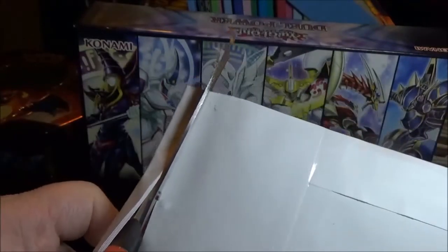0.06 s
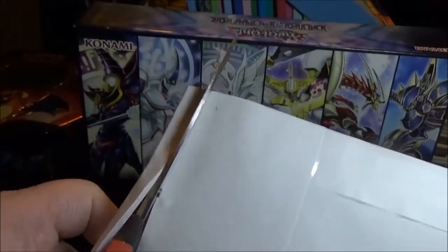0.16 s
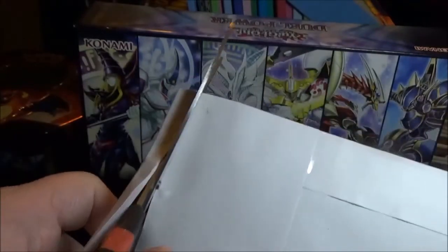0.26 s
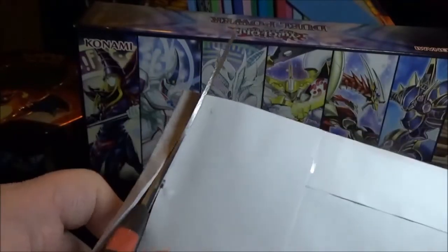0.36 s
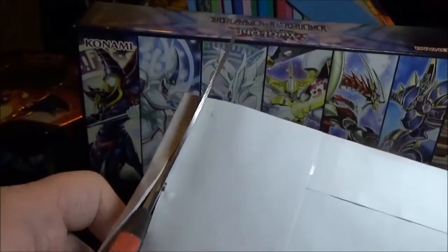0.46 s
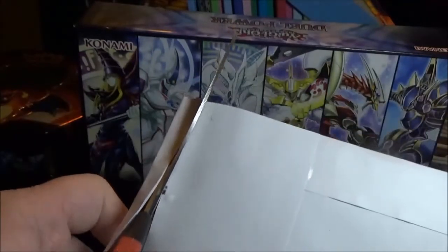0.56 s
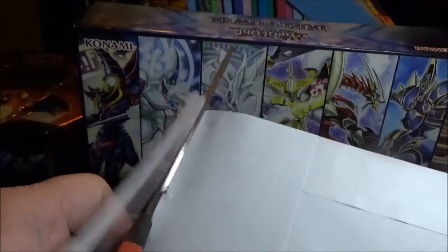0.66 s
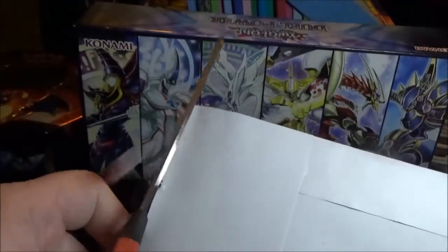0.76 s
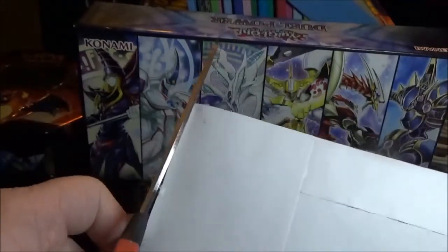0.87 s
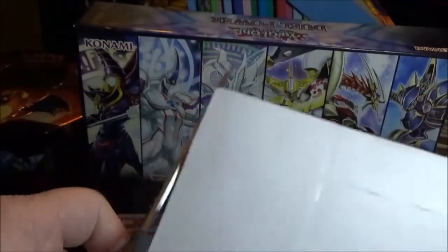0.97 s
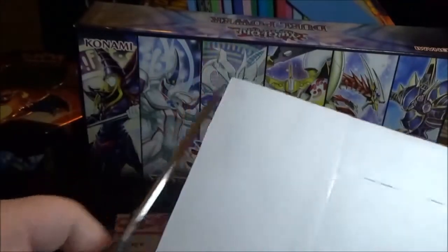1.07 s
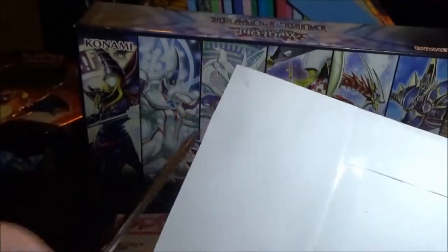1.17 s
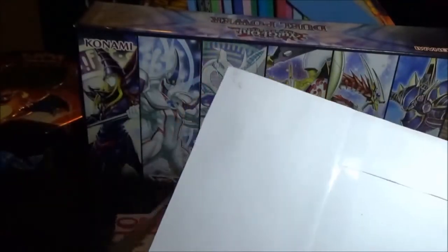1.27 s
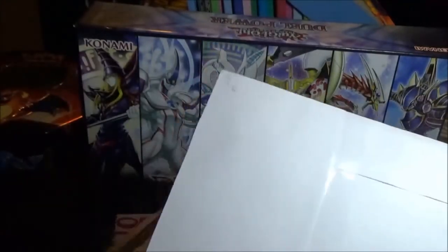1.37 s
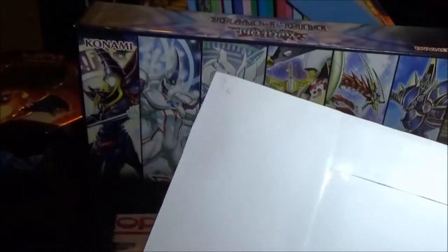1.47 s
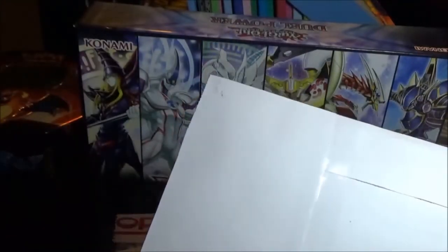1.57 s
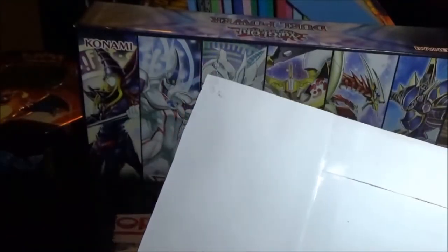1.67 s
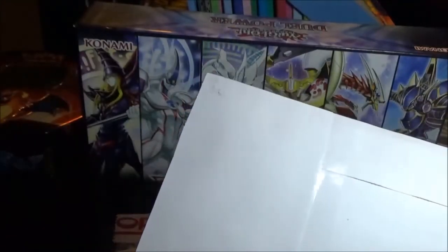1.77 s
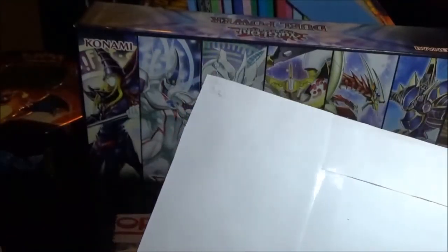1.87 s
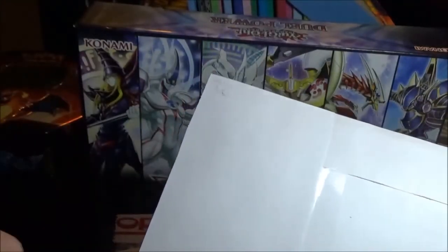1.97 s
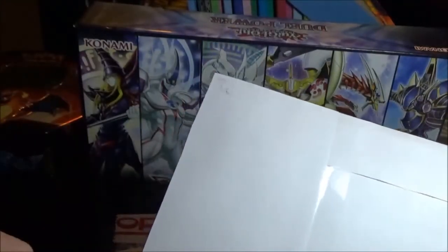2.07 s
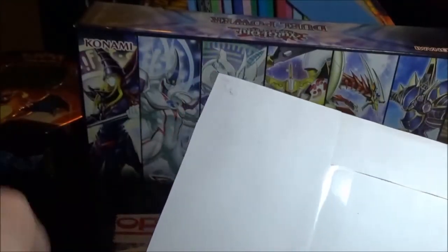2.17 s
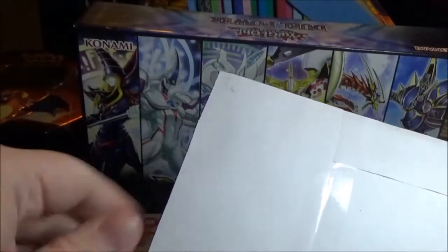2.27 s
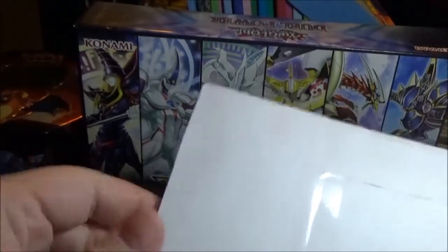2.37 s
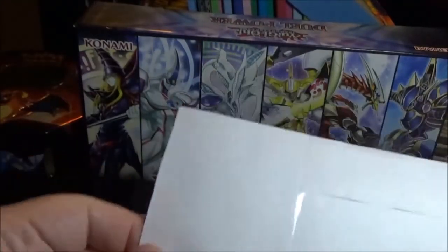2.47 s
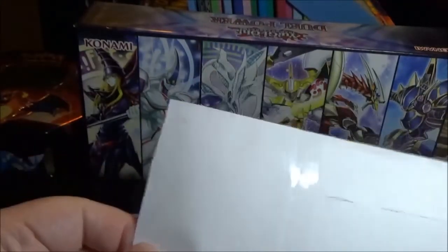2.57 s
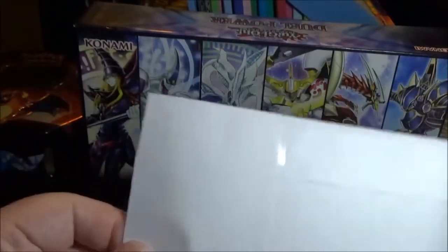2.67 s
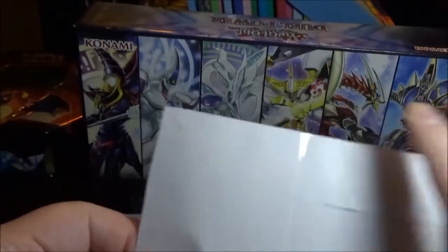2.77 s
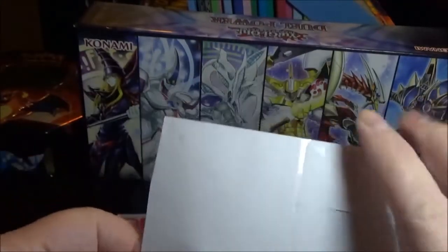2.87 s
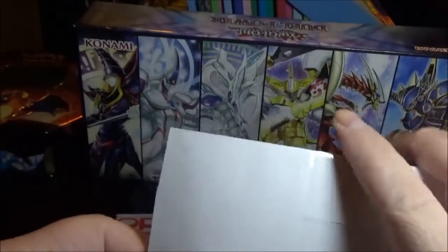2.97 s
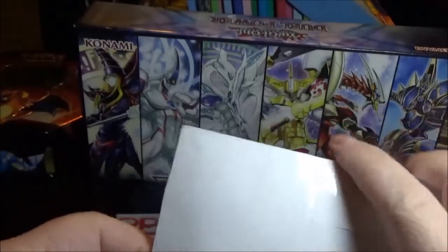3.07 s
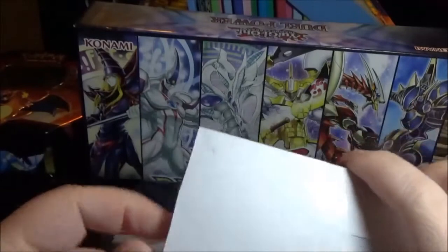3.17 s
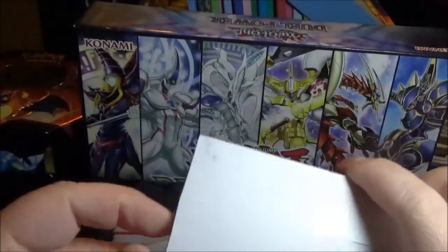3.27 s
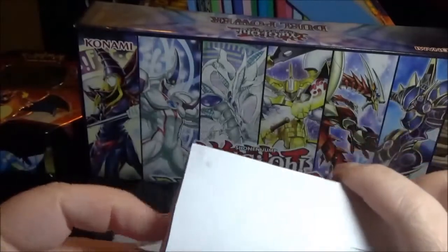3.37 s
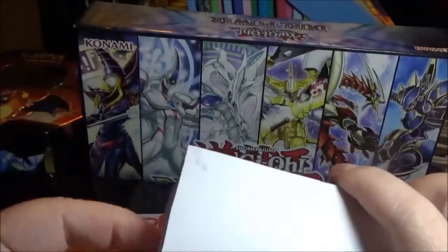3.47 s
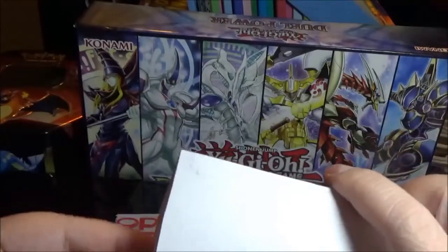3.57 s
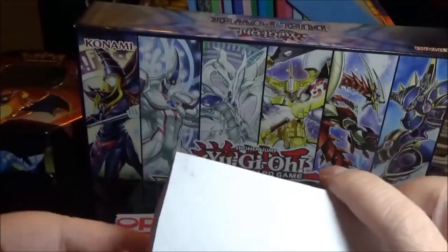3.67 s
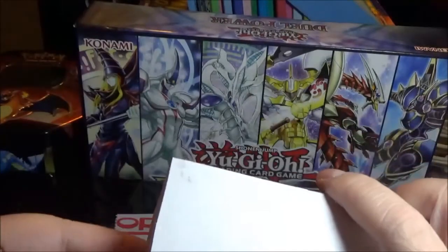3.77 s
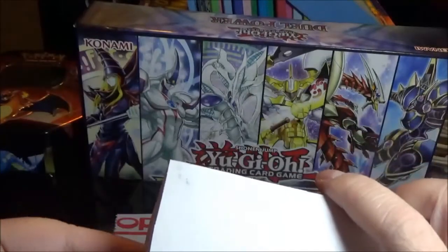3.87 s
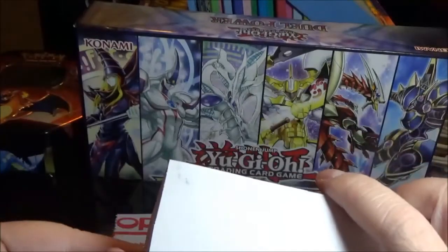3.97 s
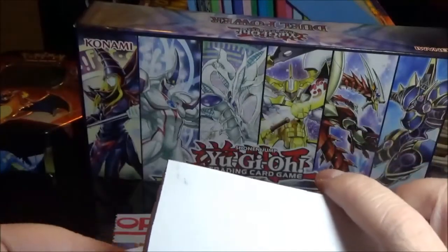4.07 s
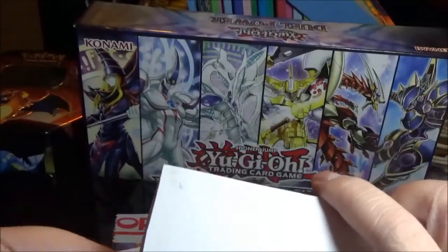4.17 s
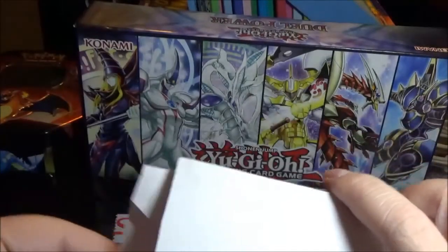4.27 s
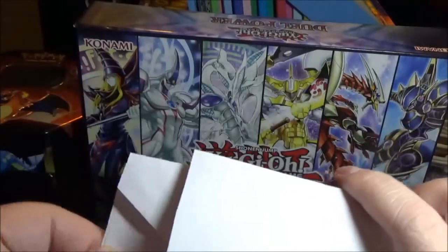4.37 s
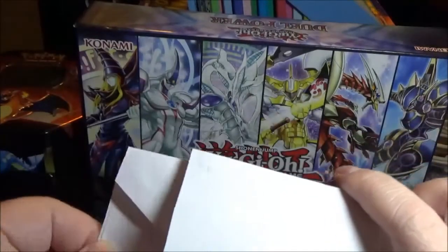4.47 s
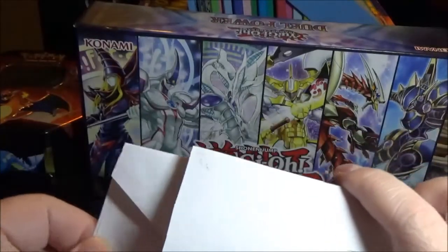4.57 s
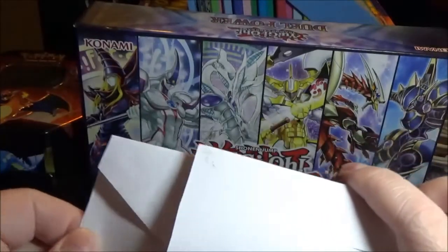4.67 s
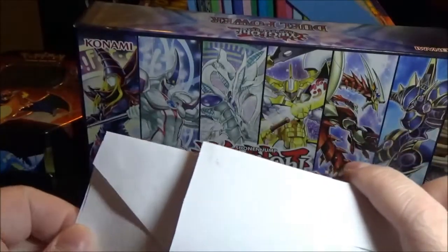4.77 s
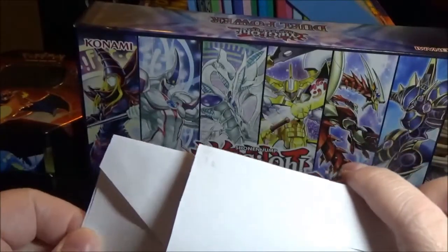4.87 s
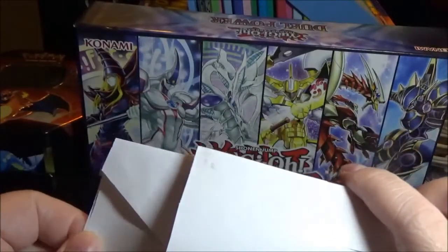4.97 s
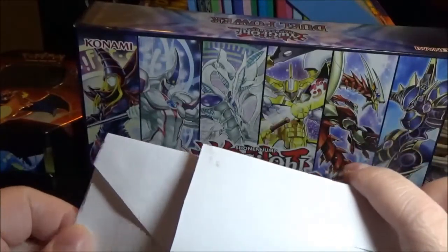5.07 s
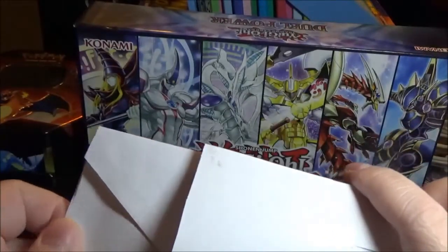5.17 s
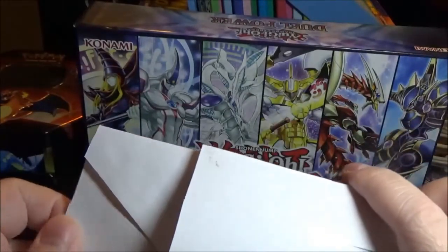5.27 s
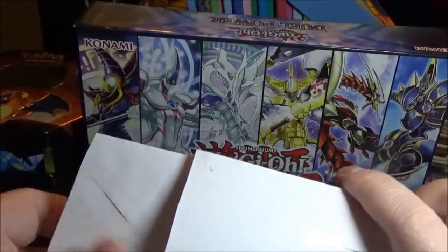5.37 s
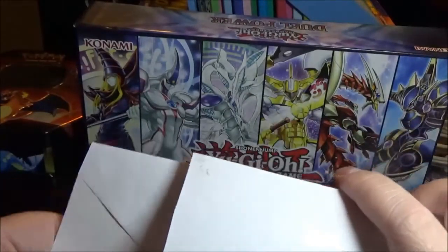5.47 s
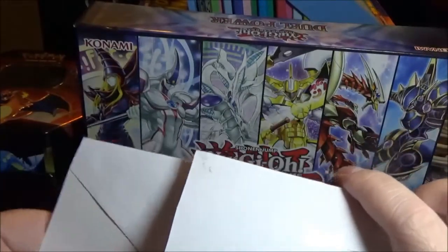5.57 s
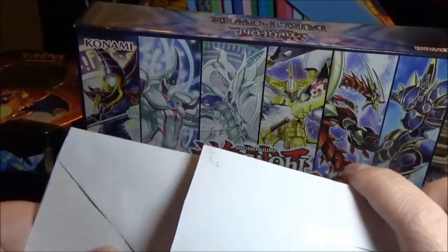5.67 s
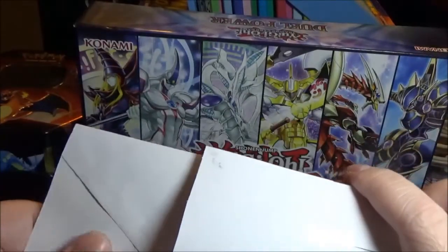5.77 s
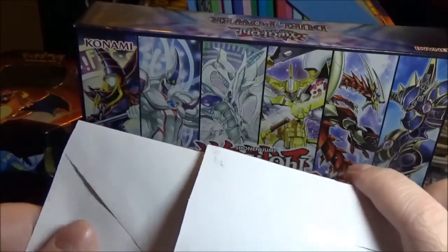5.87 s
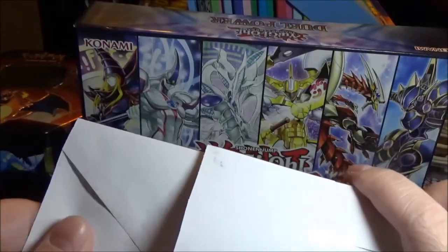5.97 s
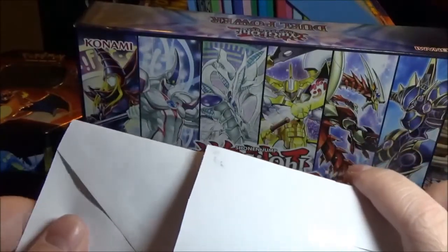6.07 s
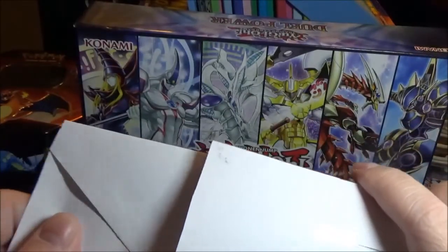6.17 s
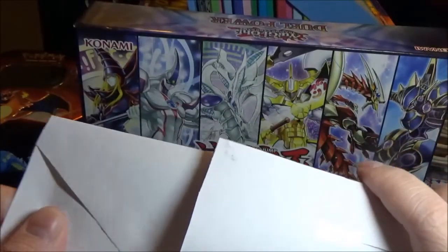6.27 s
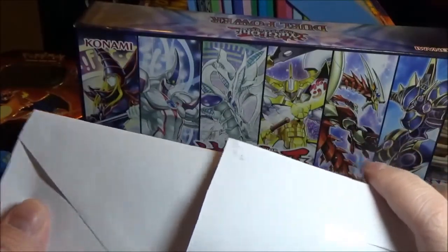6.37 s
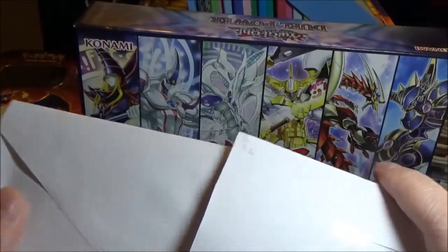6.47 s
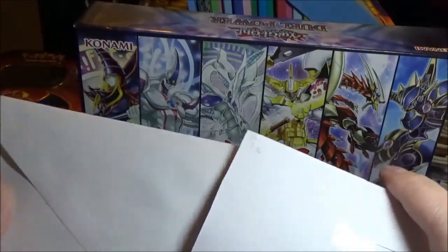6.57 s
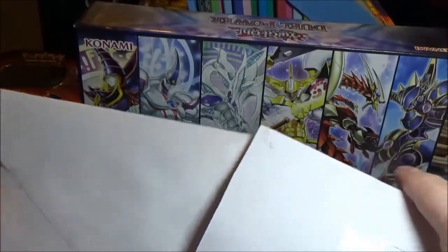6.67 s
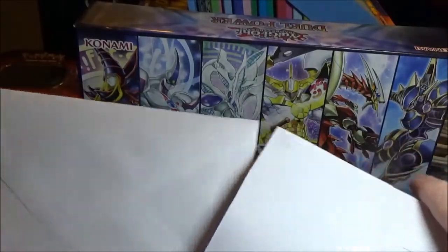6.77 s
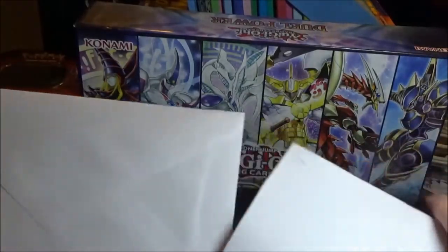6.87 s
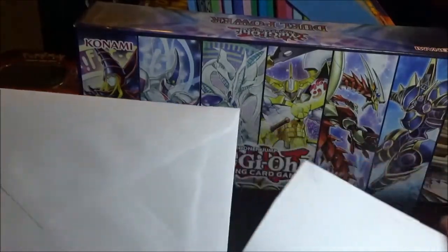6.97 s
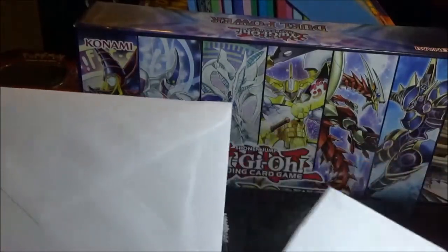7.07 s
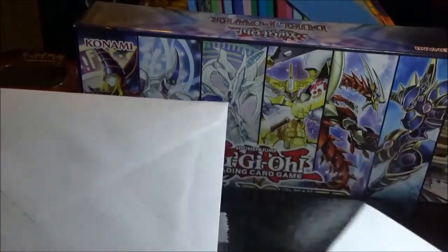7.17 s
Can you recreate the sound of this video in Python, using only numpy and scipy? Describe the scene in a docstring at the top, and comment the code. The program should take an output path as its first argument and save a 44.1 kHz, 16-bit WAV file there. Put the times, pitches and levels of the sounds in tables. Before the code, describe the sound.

In a small quiet room with a faint fan and thin electronic whine, scissors brush and cut an envelope's edge, closing with a hard metallic snip. After a pause they clunk on a wooden desk. Fingers crinkle and snap the paper, then a folded sheet is dragged out in short, hissing pulls, ending with crisp pops. Close stereo microphone.

```python
"""A small quiet room, close to a stereo microphone, with a faint fan and electronic whine.
Scissors cut the edge off a paper envelope, snip shut and are laid on a wooden desk: noise bursts and rings.
Fingers buckle the envelope: each crease snaps as a burst in three registers, some with dull low swings.
A folded sheet is drawn out in short pulls: shaped noise whose rustle and hiss grow with the speed of the slide."""
import sys
import numpy as np
from scipy import signal
from scipy.fft import rfft, irfft, next_fast_len
from scipy.io import wavfile
from scipy.ndimage import uniform_filter1d, map_coordinates

SR = 44100
rng = np.random.default_rng(int(sys.argv[2]) if len(sys.argv) > 2 else 0)


def wav_record(signal):
    """Record a signal, one row per channel, as 16-bit PCM in the file named by sys.argv[1]."""
    frames = np.transpose(np.atleast_2d(signal))
    bounded = np.clip(frames, -1, 1)
    # unit amplitude maps onto the largest positive 16-bit level
    quanta = np.round(bounded * 32767).astype(np.int16)
    wavfile.write(sys.argv[1], SR, quanta)


def invert_db(x):
    """Field ratio 10**(x/20) for x, a level in decibels (scalar or array-like)."""
    u = np.asarray(x, float) / 20
    return 10 ** u


N = 318843

# Room tone colour: (frequency [Hz], relative level [dB per Hz])
AIR_COLOUR = [(15, -45), (25, -16), (77, -11), (101, -10), (134, -8.5), (169, -12.5), (327, -8),
              (381, -11.5), (468, -14.5), (518, -12), (2390, -17), (3590, -19), (11000, -24), (14300, -61),
              (22000, -120)]
# Left-right likeness of the room tone: (frequency [Hz], correlation [-1 to 1])
AIR_LIKENESS = [(60, 0.89), (170, 0.97), (490, 0.035), (1410, 0.02), (4040, 0.17), (11600, 0.85)]
# Thin electronic tones: (frequency [Hz], relative level [dB])
WHINE_TONES = [(1803, -90.5), (3601, -84.5), (3720, -90.5), (7025, -89), (7144, -94.5), (7445, -98.5)]
# Dying away of the room: (frequency [Hz], t60 [s])
ROOM_DECAY = [(150, 0.11), (1000, 0.24), (4000, 0.23), (10000, 0.18)]
# Band limit of the recorder: (frequency [Hz], gain [dB])
BAND_LIMIT = [(10900, 0), (11030, -3.5), (11150, -39.5), (12200, -44.5), (16000, -80)]
# Place of the working hands: (time [s], left over right [dB])
HAND_PAN = [(0, -0.5), (.64, 1), (.9, 1.5), (1.14, -3), (1.8, 2.5), (2.1, 1), (2.6, -2), (3.3, -1.5),
            (3.7, 1), (4.6, -1), (5.2, 0.2), (6.8, 0), (7.05, -3)]

# Dull bumps of envelope and handles on desk or fingers: (time [s], frequency [Hz], level [dB], t60 [s])
DULL_BUMPS = [(0.637, 300, -49, .03), (.668, 149.6, -48, 0.032), (.672, 334, -40.5, 0.054),
              (2.04, 108, -55, 0.43), (2.585, 65, -54, 0.088), (2.735, 226, -39.5, 0.026),
              (3.769, 204, -45, 0.059), (6.628, 269, -45.5, 0.025), (6.75, 113, -54, .06),
              (6.874, 193, -47, 0.12), (7.089, 142, -44, 0.063)]
# Scissors touching the desk: (time [s], low level [dB], mid level [dB], mid pitch [Hz], edge level [dB])
DESK_KNOCKS = [(1.7092, -64.5, -62, 1780, -56.5), (1.7989, -49.5, -39, 1770, -55.5),
               (1.9382, -47.5, -45, 1290, -47), (1.9916, -55.5, -53.5, 1700, -52),
               (2.003, -67, -57, 1225, -56), (2.0345, -35.5, -27, 1860, -52),
               (2.039, -29.5, -28, 1530, -19), (2.1068, -50.5, -51.5, 1890, -48)]
# Blades biting and closing: (time [s], low level [dB], mid level [dB], mid pitch [Hz], edge level [dB])
BLADE_HITS = [(.1125, -80, -61.5, 2800, -53), (.2992, -54, -72, 2280, -42), (.4659, -83, -74, 2780, -48.5),
              (.517, -72, -73.5, 1990, -55), (.5457, -54, -54.5, 1440, -37.5),
              (.632, -62.5, -41, 2480, -31), (.6364, -43, -31.5, 2740, -24), (.638, -52.5, -42, 2400, -22),
              (.6395, -35, -39.5, 1720, -32), (.6697, -39.5, -53, 1850, -43),
              (.672, -26.5, -34, 1180, -10.5), (.6772, -49, -22, 2990, -13.5),
              (.6802, -51, -37.5, 2450, -53), (.6887, -65.5, -46, 2940, -48),
              (.8036, -75, -44.5, 3390, -37)]
# Creases buckling: (time [s], flap level [dB], pop level [dB], pop pitch [Hz], crisp edge level [dB])
CREASE_SNAPS = [(.8479, -58, -41.5, 905, -42), (.8872, -43.5, -49, 1420, -32), (.9033, -39, -39, 935, -40),
                (.9463, -55, -47.5, 3050, -36), (.9515, -67, -45, 3000, -36), (.9225, -51, -54, 900, -60),
                (.9839, -60, -61, 2110, -50), (.9948, -69, -70, 2400, -51), (1.1447, -71, -55, 3160, -46),
                (2.3247, -61, -67, 2150, -47), (2.3341, -53, -48, 2050, -44),
                (2.5272, -41.5, -36, 690, -29), (2.5765, -47, -47, 1960, -34),
                (2.7347, -61, -48, 1280, -69), (2.8258, -71, -75, 3120, -42),
                (2.8378, -69, -51.5, 3880, -39.5), (2.8976, -58, -62, 3710, -40),
                (3.093, -57, -41.5, 1550, -49), (3.1512, -52, -29, 2550, -22),
                (3.2465, -45.5, -35.5, 2120, -52), (3.254, -61, -46, 2090, -43),
                (3.2913, -62, -35.5, 1930, -57), (3.3642, -53, -48.5, 1630, -75),
                (3.4086, -48.5, -41.5, 1140, -61), (3.4176, -47, -50, 1020, -41),
                (3.4567, -60, -50, 1860, -50), (3.5685, -47, -40, 1430, -52), (3.6213, -46, -35, 1990, -67),
                (3.6761, -58, -48, 2360, -36), (3.772, -40, -28.5, 1700, -45),
                (3.8056, -73, -46, 2670, -36.5), (3.829, -60, -45, 2720, -42),
                (3.9154, -59, -41, 2550, -32.5), (4.1766, -51, -49.5, 890, -70),
                (4.424, -52, -53, 1290, -68), (4.7899, -65, -51, 2880, -44.5), (5.222, -72, -48, 2520, -33),
                (5.2536, -56, -73, 1900, -35), (5.2646, -50, -49, 2760, -30), (5.4425, -50, -41, 2140, -55),
                (5.862, -46, -37.5, 2830, -48), (5.939, -76, -32.5, 2040, -46),
                (6.0969, -43.5, -31, 2420, -37), (6.63, -55.5, -62, 2260, -41),
                (6.748, -53, -49, 2470, -42), (6.8172, -43.5, -41.5, 1880, -47),
                (6.8876, -52.5, -53, 1170, -72), (7.0242, -53, -49, 1750, -46),
                (7.0485, -40.5, -30, 3400, -53), (7.0882, -46, -35, 1850, -62),
                (7.0936, -37, -20.5, 3500, -22), (7.1171, -46, -32, 1750, -37)]
# Resonances of the desk top: (frequency [Hz], relative level [dB], t60 [s])
DESK_MODES = [(178.4, -2, 0.36), (658, 8, 0.065), (1204, -7, 0.028), (1337, 8, 0.041), (2190, -7, 0.03),
              (2760, -17, 0.025)]
# Resonances of the closed blades: (frequency [Hz], relative level [dB], t60 [s])
STEEL_MODES = [(2900, -20.5, 0.11), (8650, -14, 0.013), (10900, -2, 0.018)]
# Dull part of a knock: (frequency [Hz], relative level [dB per Hz])
WOOD_COLOUR = [(70, -41), (170, -6.5), (300, -4), (500, -2), (670, 3.5), (950, -8), (1500, -29)]
# Low flap of paper: (frequency [Hz], relative level [dB per Hz])
FLAP_COLOUR = [(70, -22.5), (200, -12.5), (450, -11), (680, -4), (950, -10), (1400, -8), (2500, -44)]
# Mid pop of a hit: (multiple of its pitch [ratio], relative level [dB per Hz])
POP_COLOUR = [(.15, -41.5), (.4, -8), (1, 4.5), (2.2, -10), (5, -33)]
# Crisp edge of a hit: (frequency [Hz], relative level [dB per Hz])
EDGE_COLOUR = [(2000, -34), (3600, -6), (5200, -3.5), (7000, -1), (10000, -1.5), (13000, -1.5)]

# Shaken sheet: (frequency [Hz], relative level [dB per Hz])
RUSTLE_COLOUR = [(400, -38), (900, -18), (1500, -7.5), (1800, -8), (2050, -4.5), (2500, -7.5), (3050, -6.5),
                 (3500, -9.5), (4200, -11.5), (6500, -12.5), (9000, -33)]
# Scraped fibres: (frequency [Hz], relative level [dB per Hz])
HISS_COLOUR = [(2500, -28), (4000, 0), (5300, 3), (6500, 1.5), (8500, 7), (10400, 8), (13000, -13)]
# Rumble through the hands: (frequency [Hz], relative level [dB per Hz])
RUMBLE_COLOUR = [(25, -17), (80, -5), (180, -3.5), (450, -4), (680, 1.5), (950, -4), (2000, -28)]
# Left-right likeness of the sliding paper: (frequency [Hz], correlation [-1 to 1])
PAPER_LIKENESS = [(100, 0.7), (350, 0.51), (1000, 0.86), (2000, 0.91), (10000, 0.93)]
# The envelope never lies quite still in the fingers: (time [s], low rumble level [dB])
HAND_STIR = [(0, -78), (.6, -75), (.8, -66), (1.03, -82), (2.3, -82), (2.45, -80), (2.7, -72), (3.3, -72.5),
             (3.8, -61.5), (4.15, -66.5), (4.6, -70), (4.84, -60.5), (5.0, -65), (5.46, -62), (5.75, -65.5),
             (6.88, -61.5), (7.0, -67.5), (7.085, -56), (7.14, -82), (7.23, -65)]
# Sheet drawn out of the envelope:
# (time of top speed [s], speeding up [s], slowing down [s], rustle level [dB], hiss level [dB])
SHEET_PULLS = [(4.21, .04, 0.059, -50.5, -55), (4.314, 0.16, 0.12, -46, -40.5),
               (4.495, 0.051, 0.029, -59.5, -57.5), (4.66, 0.14, 0.12, -47, -45.5),
               (4.86, 0.087, 0.098, -49, -52), (5.01, 0.029, 0.12, -49.5, -52),
               (5.1, 0.055, 0.049, -45, -42), (5.19, 0.054, 0.062, -53, -52.5),
               (5.268, 0.012, 0.016, -51, -42.5), (5.3, 0.074, 0.075, -51, -49.5),
               (5.384, 0.017, 0.032, -60, -48.5), (5.445, 0.037, 0.091, -46, -49.5),
               (5.6, 0.11, 0.12, -40.5, -38), (5.77, 0.07, 0.037, -56, -49),
               (5.851, 0.048, 0.066, -56, -48), (5.935, 0.052, 0.043, -58, -57),
               (6.02, 0.024, .03, -50, -46), (6.08, 0.051, 0.057, -45.5, -46), (6.17, 0.066, 0.2, -42, -41),
               (6.26, 0.078, 0.1, -43.5, -40), (6.37, 0.062, 0.038, -52.5, -46),
               (6.47, 0.085, 0.11, -50, -43), (6.62, 0.082, 0.073, -49, -42.5),
               (6.72, 0.093, .06, -51.5, -44), (6.81, .07, 0.062, -51.5, -50.5)]
# Blades and fingers brushing the paper:
# (time of top speed [s], speeding up [s], slowing down [s], rustle level [dB], hiss level [dB])
PAPER_RUBS = [(.125, 0.027, 0.026, -74, -64), (.2, 0.053, 0.059, -51, -45), (.3, 0.044, 0.019, -61, -65),
              (.33, 0.018, 0.014, -77, -60), (.509, .07, 0.046, -67, -57), (.569, .04, .04, -76, -62),
              (.628, 0.011, 0.011, -55, -55), (.775, 0.047, 0.094, -58.5, -52),
              (.85, 0.012, 0.017, -51, -68), (.92, 0.099, 0.081, -56, -52), (1.985, 0.023, 0.028, -63, -72),
              (2.33, 0.017, .05, -52.5, -58), (2.462, 0.082, 0.2, -61, -55), (2.55, 0.05, 0.043, -51, -48),
              (2.58, 0.0056, 0.044, -43.5, -48), (2.64, 0.079, 0.028, -50, -38.5),
              (2.785, 0.023, 0.036, -57, -48.5), (2.903, 0.029, 0.12, -56, -48.5),
              (3.02, 0.019, .05, -59, -53.5), (3.185, 0.26, 0.14, -56, -50.5),
              (3.314, 0.06, 0.065, -61, -53), (3.414, 0.052, 0.081, -53.5, -53),
              (3.55, 0.1, 0.11, -52, -55), (3.62, .018, 0.018, -38, -46), (3.694, 0.027, 0.032, -81, -56),
              (3.825, 0.12, 0.095, -53, -55), (3.951, 0.1, 0.12, -56, -56.5), (4.095, 0.1, 0.082, -53, -53),
              (7.018, 0.093, 0.012, -55, -52.5), (7.06, .015, 0.027, -48, -68),
              (7.11, .03, 0.024, -42, -68)]


def unit(x):
    """Scales a sound to rms 1."""
    return x / np.sqrt(np.mean(x ** 2) + 1e-20)


def along(points, hz):
    """Reads (frequency, value) points on a log frequency axis."""
    f, v = np.transpose(points)
    return np.interp(np.log(hz + 1), np.log(f + 1), v)


def filtered(x, response):
    """Shapes a sound by a response given as a function of frequency."""
    size = next_fast_len(x.shape[-1] + 8192)
    spectrum = rfft(x, size) * response(np.fft.rfftfreq(size, 1 / SR))
    return irfft(spectrum, size)[..., :x.shape[-1]]


def gain_curve(rows):
    """Draws (time, dB) points out as one gain per sample."""
    s, db = np.transpose(rows)
    return invert_db(np.interp(np.arange(N) / SR, s, db))


def rush(colour, likeness, patchy_db, grain_db):
    """Stereo noise of rms 1: patches of random gain, and grains of uneven strength, now and then hard."""
    grain = unit(uniform_filter1d(rng.exponential(size=N) - 1, size=30))
    z = signal.stft(invert_db(grain_db * grain) * rng.standard_normal((2, N)), nperseg=512)[2]
    patches = uniform_filter1d(rng.standard_normal(z.shape[1:]), size=5, axis=0)  # across frequency
    patches = uniform_filter1d(patches, size=8, axis=1)  # across time
    pair = signal.istft(z * invert_db(patchy_db * unit(patches)), nperseg=512)[1][:, :N]

    def mid_side(hz):
        turn = np.arccos(np.clip(along(likeness, hz), -1, 1)) / 2
        return invert_db(along(colour, hz)) * [np.cos(turn), np.sin(turn)]

    mid, side = filtered(pair, mid_side)
    return unit(np.array([mid + side, mid - side]))


def whine():
    """Thin electronic tones, each a sine whose phase wavers at random."""
    t, tones = np.arange(N) / SR, np.zeros(N)
    for hz, db in WHINE_TONES:
        waver = np.cumsum(rng.normal(0, 0.03, N))  # radians
        tones += invert_db(db + 5) * np.sin(2 * np.pi * hz * t + waver)
    return tones


def room_tone():
    """Steady air noise of the faint fan, with the wavering whine over it."""
    return invert_db(-65) * rush(AIR_COLOUR, AIR_LIKENESS, patchy_db=0.2, grain_db=1.5) + whine()


def room(x):
    """Walls answer after a few milliseconds, each frequency dying at its own speed, much alike left and right."""
    out, step = np.zeros((2, N + SR)), SR // 3
    for at in range(0, N, step):  # a fresh random tail for every third of a second
        hz, t, z = signal.stft(rng.standard_normal((2, SR // 2)), SR, nperseg=256)
        decay = invert_db(-60 * t / along(ROOM_DECAY, hz)[:, None])
        mid, side = signal.istft(z * decay, SR, nperseg=256)[1]
        tail = np.array([mid + 0.48 * side, mid - 0.34 * side])
        wet = signal.fftconvolve(x[:, at:at + step], tail / np.linalg.norm(tail[0]), axes=1)
        out[:, at + 350:][:, :wet.shape[1]] += wet  # delay in samples
    return out[:, :N]


def thuds():
    """A soft contact is one low, quickly damped swing."""
    out, t = np.zeros(N + SR), np.arange(SR // 4) / SR
    for s, hz, db, t60 in DULL_BUMPS:
        shape = invert_db(db - 60 * t / t60) * (1 - np.exp(-t / 0.00067))
        out[round(s * SR):][:len(t)] += shape * np.sin(2 * np.pi * hz * t)
    return out[:N]


def hits(events, low, modes, usual_t60, shorter, ring_db, flap_slower, lead, crack):
    """A crack inside a burst that swells for a moment and dies, in three registers; the struck body rings."""
    before = SR // 100
    out, t = np.zeros(N + SR), np.arange(-before, SR // 6) / SR
    after = np.maximum(t, 0)
    for s, flap_db, pop_db, pop_hz, edge_db in events:
        # crisper hits die sooner; at an edge level of -37 dB they take their usual time
        t60 = max(usual_t60 * invert_db(-shorter * (edge_db + 37)), 0.003)
        pop = [(pop_hz * k, db) for k, db in POP_COLOUR]
        registers = [(flap_db, low, flap_slower * t60),
                     (pop_db, pop, t60),
                     (edge_db, EDGE_COLOUR, 0.89 * t60)]
        burst = np.zeros(len(t))
        for db, colour, life in registers:
            shape = invert_db(-60 * np.where(t < 0, -t / lead, t) / life)
            push = shape * rng.standard_normal(len(t))
            push[before] = crack * np.linalg.norm(shape)  # the instant of release
            part = filtered(push, lambda hz: invert_db(along(colour, hz)))
            burst += invert_db(db + 3) * part * np.linalg.norm(shape) / np.linalg.norm(part)
        for hz, level, long in modes:
            # low modes follow the low register, high modes the edge
            strength = along([(900, flap_db), (3500, edge_db)], hz) + ring_db + level + rng.normal(0, 2.4)
            # each ring is blurred by a random phase drift: radians a sample
            drift = np.cumsum((t > 0) * rng.normal(0, 0.07 * np.sqrt(hz / 1000), len(t)))
            burst += invert_db(strength - 60 * after / long) * np.sin(2 * np.pi * hz * after + drift)
        out[round(s * SR) - before:][:len(t)] += burst
    return out[:N]


def desk_knocks():
    """Scissors laid on the desk: dull wooden bursts that ring the desk top."""
    return hits(DESK_KNOCKS, WOOD_COLOUR, DESK_MODES, usual_t60=0.026, shorter=0.15, ring_db=-11.5,
                flap_slower=2.2, lead=0.0173, crack=0.57)


def scissor_blades():
    """Blades bite and snip shut: paper bursts with a hard crack, ringing the steel."""
    return hits(BLADE_HITS, FLAP_COLOUR, STEEL_MODES, usual_t60=0.012, shorter=0.18, ring_db=-7,
                flap_slower=0.92, lead=0.67, crack=0.55)


def crease_snaps():
    """Creases buckle and let go: mostly noise, a slight crack and no ring."""
    return hits(CREASE_SNAPS, FLAP_COLOUR, [], usual_t60=0.015, shorter=0.14, ring_db=0,
                flap_slower=1.58, lead=0.34, crack=0.2)


def strokes(rows, pointed, rustle_grows, hiss_grows):
    """Powers of rustle and hiss as each stroke speeds up from rest, jerks a little and slows down again."""
    out, t = np.zeros((2, N)), np.arange(N) / SR
    jerks_per_s, jerk_db = 35, 1.22
    wobble = rng.standard_normal(int(N * jerks_per_s / SR) + 4)
    jerks = invert_db(jerk_db * map_coordinates(wobble, [t * jerks_per_s]))
    for s, up, down, rustle_db, hiss_db in rows:
        at = slice(max(round((s - up) * SR), 0), round((s + down) * SR))
        away = np.minimum(np.abs(t[at] - s) / np.where(t[at] < s, up, down), 1)
        speed = jerks[at] * ((1 - pointed) * np.cos(np.pi / 2 * away) + pointed * (1 - away))
        rustle = invert_db(rustle_db) * np.abs(speed) ** rustle_grows
        hiss = invert_db(hiss_db) * np.abs(speed) ** hiss_grows
        out[:, at] += np.array([rustle, hiss]) ** 2
    return out


def sliding_paper():
    """Friction shakes the sheet, scrapes its fibres and rumbles through the hands."""
    stir = gain_curve(HAND_STIR)
    pulls = strokes(SHEET_PULLS, pointed=0.36, rustle_grows=0.79, hiss_grows=1.1)
    rubs = strokes(PAPER_RUBS, pointed=0.97, rustle_grows=1.42, hiss_grows=1.8)
    faint = invert_db([[-5], [-6]]) * stir  # rustle and hiss that go with the stirring hands
    rustle, hiss = np.sqrt(pulls + rubs + faint ** 2)
    rumble = np.sqrt(stir ** 2 + invert_db(-23.5) ** 2 * pulls[0] + invert_db(-8.5) ** 2 * rubs[0])
    return (rustle * rush(RUSTLE_COLOUR, PAPER_LIKENESS, patchy_db=1.6, grain_db=1.8)
            + hiss * rush(HISS_COLOUR, PAPER_LIKENESS, patchy_db=1.2, grain_db=1.6)
            + rumble * rush(RUMBLE_COLOUR, PAPER_LIKENESS, patchy_db=3.0, grain_db=0.5))


def scene():
    """Close hits and sliding paper panned with the hands, their room, and room tone."""
    left = gain_curve(HAND_PAN)
    sides = np.array([np.sqrt(left), 1 / np.sqrt(left)])
    close = sides * (thuds() + desk_knocks() + scissor_blades() + crease_snaps())
    paper = sides * sliding_paper()
    reflections = invert_db(-10.5) * room(close + invert_db(-3) * paper)
    return close + paper + reflections + room_tone()


def roll_off(x):
    """The treble ends steeply here."""
    return signal.sosfilt(signal.butter(12, 12170, fs=SR, output="sos"), x)


def record(dry):
    """The recorder cuts steeply at its band limit."""
    mix = filtered(dry, lambda hz: invert_db(along(BAND_LIMIT, hz)))
    return roll_off(mix)


dry = scene()
out = record(dry)
wav_record(out)
```